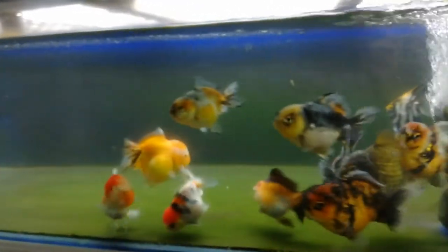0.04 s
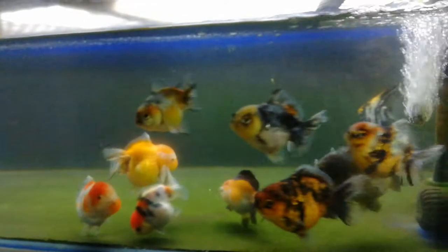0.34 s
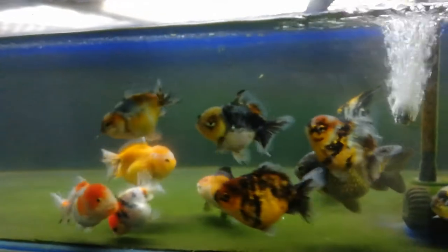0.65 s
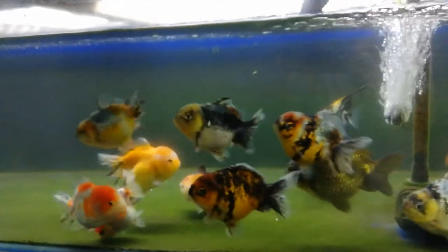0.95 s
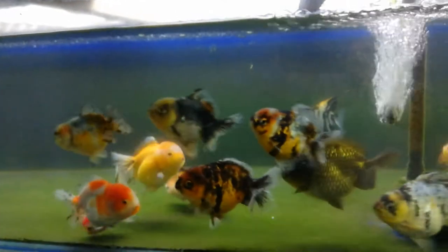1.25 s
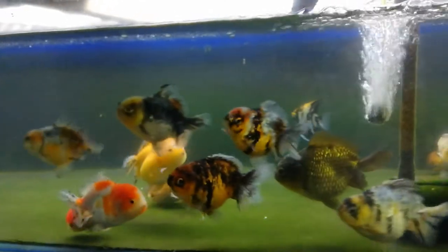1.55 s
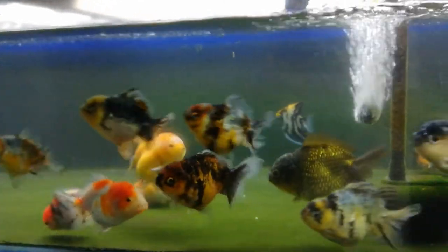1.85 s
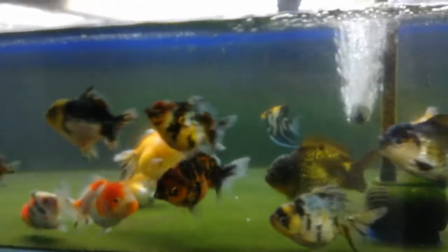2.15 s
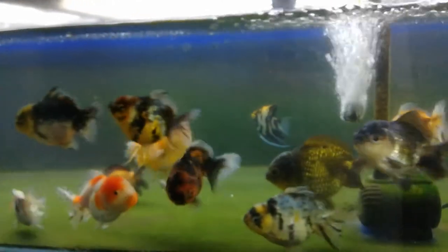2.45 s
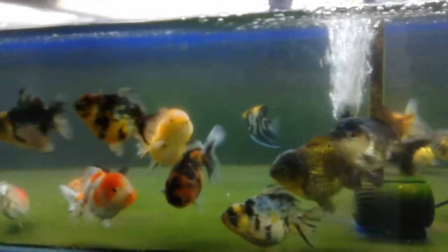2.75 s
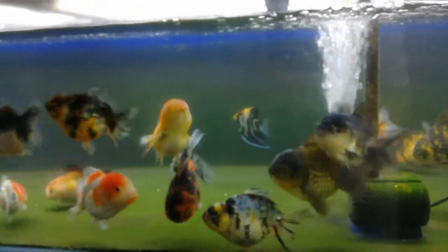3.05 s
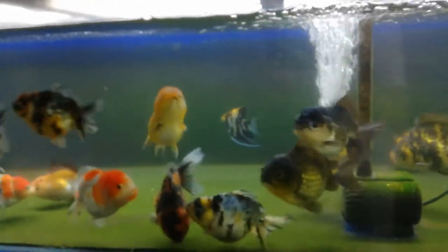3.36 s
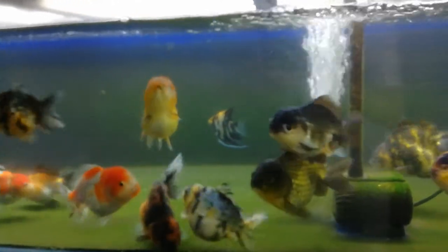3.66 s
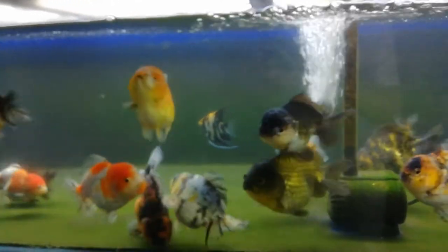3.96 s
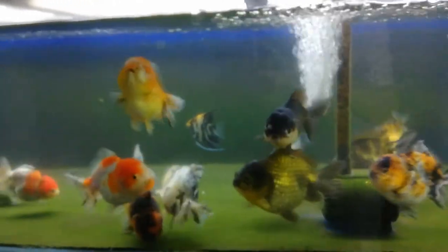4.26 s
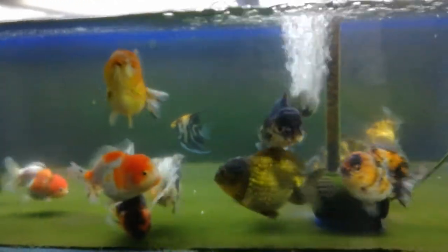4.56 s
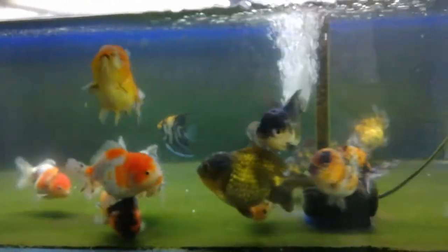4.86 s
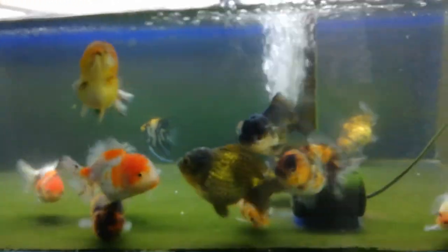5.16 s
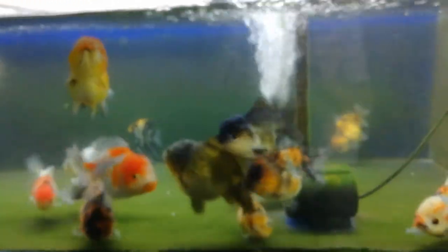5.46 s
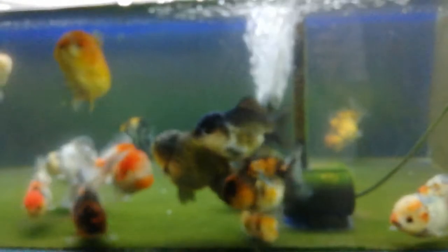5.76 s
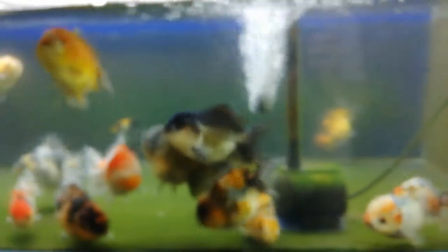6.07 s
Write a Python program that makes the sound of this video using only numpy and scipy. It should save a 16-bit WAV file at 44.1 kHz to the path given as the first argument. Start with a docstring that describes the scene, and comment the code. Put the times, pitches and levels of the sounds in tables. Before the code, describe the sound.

An air stone bubbles in a fish tank with a steady fizzing hiss, small pops and gurgles, over a low pump hum.

```python
"""An air stone fizzes in a glass fish tank, on the right: countless tiny bubbles make a steady hiss.
Bubble films snap at the surface, single bubbles ring as they pinch off, and clusters gurgle as they
break. The glass and the room echo it all. Behind it an air pump hums on mains power and throbs
against a slightly faster motor, over a low room rumble and one soft knock."""
import sys
import numpy as np
from scipy import signal
from scipy.fft import rfft, irfft, next_fast_len
from scipy.io import wavfile
from scipy.ndimage import uniform_filter1d, map_coordinates

SR = 44100
rng = np.random.default_rng(int(sys.argv[2]) if len(sys.argv) > 2 else 0)


def put_to_file(sound):
    """Save the sound as 16-bit audio at rate SR, in the file named by the first command-line argument."""
    columns = np.atleast_2d(sound).T  # one column per channel
    safe = np.clip(columns, -1, 1)
    whole_steps = np.round(safe * 32767)
    wavfile.write(sys.argv[1], SR, whole_steps.astype(np.int16))


N = 269451

# The foam's hiss as the tank colours it. Each row: frequency in Hz, relative level in dB.
FIZZ_COLOUR = [(300, -22), (600, -6), (1300, -5.5), (2200, -2), (3500, .5), (4400, -6), (5800, -9),
               (8400, -1.5), (9050, 1), (9700, -2), (11600, -2.5), (12700, -7.5), (14100, -8.5),
               (15700, -15)]
# The loudest bubble films snapping. Each row: start in seconds, relative level in dB,
# centre of the click in Hz, level of the lower body in dB compared with the click.
FILM_POPS = [(0.708, -30, 10100, -17), (0.8182, -24, 10300, -13), (0.8525, -21, 8300, -20),
             (0.884, -26, 10000, -30), (1.811, -27.5, 9500, -12.5), (2.2775, -24, 9400, -7),
             (2.5427, -25.5, 11700, -32), (3.474, -29, 8930, -10), (3.727, -28, 9050, -5),
             (4.0423, -32, 9600, -20), (4.305, -32, 10400, -6), (4.9383, -22, 8250, -10),
             (5.6925, -24, 9200, -14)]
# The loudest ringing bubbles. Each row: start in seconds, relative level in dB, pitch in Hz.
RINGING_BUBBLES = [(.376, -30, 3400), (.717, -29, 3290), (.815, -38.5, 344), (.854, -22, 7860),
                   (1.1225, -27, 3260), (1.282, -19, 2625), (1.34, -35, 1486), (1.832, -31.5, 3160),
                   (1.984, -31, 3000), (2.279, -34, 4950), (2.624, -33.5, 3400), (2.681, -37.5, 850),
                   (2.8175, -27, 2540), (4.043, -25.5, 1650), (4.947, -25.5, 6830), (5.242, -32, 1427),
                   (5.663, -28.5, 3200), (5.694, -31, 5140)]
# The loudest clusters breaking. Each row: start in seconds, relative level in dB, centre in Hz.
BREAKING_CLUSTERS = [(0.11, -27.5, 2420), (2.016, -34, 2420), (2.671, -34, 2040), (2.908, -31.5, 3000),
                     (4.0405, -29, 2720), (4.1082, -29.5, 3250), (4.187, -30, 4060), (4.239, -31, 2840),
                     (4.8797, -29, 2320), (5.253, -26.5, 2300), (6.019, -29.5, 2850)]
# The left microphone faces away from the tank. Each row: frequency in Hz, change in level in dB.
LEFT_SHADE = [(300, -12), (700, 0), (1300, -3.5), (2600, -14.5), (3400, -12.5), (4200, -12), (6000, -14.5),
              (9000, -24.5), (12000, -28.5), (15800, -26)]
# The pump's tones. Each row: multiple of its stroke rate, base levels in dB on the left and right.
PUMP_TONES = [(2, -46, -46), (3, -56, -56), (5, -63.5, -72), (6, -64, -59), (7, -60.5, -63),
              (8, -69.5, -82), (9, -87, -65.5), (12, -65, -79)]
# The second motor's tones. Each row: multiple of its speed, base levels in dB on the left and right.
MOTOR_TONES = [(2, -55.5, -56), (3, -58, -61), (4, -49, -49), (5, -73, -60.5), (6, -64.5, -64),
               (7, -71, -64.5), (12, -78, -50), (13, -120, -75), (14, -85, -59.5), (15, -79.5, -54.5),
               (16, -83, -60), (19, -63, -110), (20, -77, -61.5), (21, -79, -59), (23, -61, -74),
               (24, -82, -64.5), (25, -86, -57), (26, -63, -61), (28, -90, -117), (30, -95, -81)]
# A soft, low knock. Each row: start in seconds, level in dB.
SOFT_KNOCKS = [(4.554, -37.5)]
# The room's rumble. Each row: frequency in Hz, relative level in dB.
RUMBLE_COLOUR = [(15, -13), (35, -0.5), (50, 8.5), (75, -6.5), (110, 2), (170, -3.5), (350, -1.5),
                 (520, -3.5), (900, -7), (2000, -15), (6000, -35)]
# How alike the rumble is on both sides. Each row: frequency in Hz, likeness from 0 to 1.
RUMBLE_LIKENESS = [(100, .99), (250, 0.74), (500, 0), (900, 1)]

LEFT_DELAY = 26  # samples by which the tank's direct sound comes later on the left
TIME = np.arange(N) / SR
EVENT_TIME = np.arange(SR // 4) / SR  # seconds within one short sound
EVENT_SAMPLES = len(EVENT_TIME)


def fizz(hiss_db=-40.5, direct_share=0.34, patchy_db=2.5):
    """Countless tiny bubbles merge into a hiss, partly heard directly, partly as echoes."""
    noise = rng.standard_normal(N)
    direct = np.sqrt(direct_share) * np.array([np.roll(noise, LEFT_DELAY), noise])
    echoes = np.sqrt(1 - direct_share) * rng.standard_normal((2, N))
    spectrum = signal.stft(direct + echoes, nperseg=1024)[2]
    # Bubbles of similar size come in clumps: louder patches in pitch and time.
    clumps = uniform_filter1d(rng.standard_normal(spectrum.shape[1:]), size=4, axis=0)
    clumps = uniform_filter1d(clumps, size=8, axis=1)
    hiss = signal.istft(spectrum * amp(patchy_db * unit(clumps)), nperseg=1024)[1][:, :N]
    flicker_db = 0.29 * wobble(4.45) + 0.18 * wobble(35)
    return amp(hiss_db + flicker_db) * unit(coloured(hiss, FIZZ_COLOUR))


def crackle(level_db=-37, spread_db=9, rarity=1.23, body_db=-7, body_hz=4700, count=190):
    """Small bubbles pop at random moments; larger ones sound lower and have more body."""
    out = np.zeros((2, N))
    for when, size, loud in rng.random((count, 3)):
        snap = coloured(tank_echoes(np.ones(1), direct_db=-14), FIZZ_COLOUR)
        click = unit(band(snap, 13500 - 7500 * size ** 1.53, octaves=0.35))
        body = amp(body_db) * size * unit(band(snap, body_hz, octaves=0.53))
        add(out, when * (N - 1) / SR, click + body, level_db - spread_db * (1 - loud ** rarity))
    return out


def pops(gain_db=-6, body_hz=4470):
    """A bubble's film snaps with a bright click; the hollow under it adds a lower body."""
    out = np.zeros((2, N))
    for start, db, hz, body_db in FILM_POPS:
        snap = tank_echoes(np.ones(1), direct_db=-13, glass_s=.075, room_s=.42, room_db=-7)
        click = band(coloured(snap, FIZZ_COLOUR), hz, octaves=0.58)
        add(out, start, click, db + gain_db)
        add(out, start, band(snap, body_hz, octaves=0.16), db + gain_db + body_db)
    return out


def bubble_ring(hz, cycles, rise):
    """A tone fades to about a third in `cycles` swings; its pitch climbs as a bubble nears the surface."""
    age = EVENT_TIME * hz / cycles
    pitch = hz * (1 + rise * (1 - np.exp(-age)))
    soft_start = 1 - np.exp(-5 * age)
    return np.sin(2 * np.pi * np.cumsum(pitch) / SR) * np.exp(-age) * soft_start


def bubbles(gain_db=-6, small_db=-42, spread_db=7, rarity=3, count=350):
    """Single bubbles ring as they pinch off, over a patter of small ones of which few stand out."""
    out = np.zeros((2, N))
    for start, db, hz in RINGING_BUBBLES:
        cycles = 6.3 * (3000 / hz) ** 0.4  # larger, lower bubbles ring for more swings
        ring = bubble_ring(hz, cycles, rise=.04)
        echoed = tank_echoes(ring, direct_db=-10, glass_s=.06, room_s=.36, room_db=-6)
        add(out, start, echoed, db + gain_db)
    for when, size, loud in rng.random((count, 3)):
        hz = 3950 * np.exp(-1.1 * size ** 1.387)  # small, high bubbles are the commonest
        echoed = tank_echoes(bubble_ring(hz, cycles=6.9, rise=0.086), direct_db=-9, room_s=0.74)
        db = small_db - spread_db * (1 - loud ** rarity) - 4 * size
        add(out, when * (N - 1) / SR, echoed, db)
    return out


def gurgles(gain_db=-7, fade_s=0.02, bursts_per_s=700, faint_db=-37, faint_hz=2900, count=10):
    """A raft of bubbles collapses in a quick run of bursts; fainter rafts break at random moments."""
    out = np.zeros((2, N))
    faint = [(when * (N - 1) / SR, faint_db, faint_hz * 2 ** (pitch - .5))
             for when, pitch in rng.random((count, 2))]
    for start, db, hz in BREAKING_CLUSTERS + faint:
        signs = rng.choice([-1, 1], EVENT_SAMPLES)
        bursts = rng.random(EVENT_SAMPLES) < bursts_per_s / SR
        run = signs * bursts * np.exp(-EVENT_TIME / fade_s)
        run[0] = 1.7  # the first burst sets off the others
        echoed = tank_echoes(run, direct_db=-6.5, room_db=-0.5)
        add(out, start, band(echoed, hz, octaves=0.62), db + gain_db)
    return out


def tank_echoes(x, direct_db, glass_s=0.065, room_s=0.49, room_db=-8):
    """The direct sound, then echoes of glass and room that fade by 60 dB in glass_s and room_s seconds."""
    fade = amp(-60 * EVENT_TIME / glass_s) + amp(room_db - 60 * EVENT_TIME / room_s)
    response = rng.standard_normal((2, EVENT_SAMPLES)) * fade / np.linalg.norm(fade)
    response[0, LEFT_DELAY] += amp(direct_db)
    response[1, 0] += amp(direct_db)
    return signal.fftconvolve(x[None], response, axes=1)[:, :EVENT_SAMPLES]


def hum_tone(multiple, base_hz, left_db, right_db, swell, in_step_s=.045, waver_db=0.97):
    """One wavering tone of a motor; reflections shift higher tones more between left and right."""
    hz = multiple * base_hz
    offset = rng.uniform(0, 2 * np.pi) * (multiple - 2)  # both motors' second tones line up at in_step_s
    jitter = 0.017 * multiple ** 1.07 * wobble(7)
    phase = 2 * np.pi * hz * (TIME - in_step_s) + offset + jitter + np.angle(swell)
    tone = np.array([amp(left_db) * np.sin(phase - hz / 290), amp(right_db) * np.sin(phase)])
    return np.sqrt(2) * np.abs(swell) * tone * amp(waver_db * wobble(5))


def hum(pump_hz=50.012, motor_hz=53.027, swell_hz=0.33, crest_s=2.05, faint_hz=164.6):
    """The pump and a faster motor hum; their second tones throb together six times a second."""
    # A hum just below the pump's third tone makes that tone slowly swell and sink.
    swell = 1 + amp(-4.5) * np.exp(-2j * np.pi * swell_hz * (TIME - crest_s))
    pump = sum(hum_tone(k, pump_hz, left, right, swell if k == 3 else 1) for k, left, right in PUMP_TONES)
    motor = sum(hum_tone(k, motor_hz, left, right, swell=0.97) for k, left, right in MOTOR_TONES)
    faint_tone = amp(-63) * np.sqrt(2) * np.sin(2 * np.pi * faint_hz * TIME)
    return pump + motor + faint_tone


def knocks(knock_hz=190):
    """A dull bump that dies away too fast to ring."""
    out = np.zeros((2, N))
    bump = bubble_ring(knock_hz, cycles=1, rise=0)
    for start, db in SOFT_KNOCKS:
        add(out, start, np.array([bump, bump]), db)
    return out


def rumble(level_db=-53):
    """Low noise of the room and moving water; its deepest part is nearly alike on both sides."""
    def response(hz):
        angle = np.arccos(np.clip(along(RUMBLE_LIKENESS, hz), -1, 1)) / 2
        return amp(along(RUMBLE_COLOUR, hz)) * [np.cos(angle), np.sin(angle)]
    shared, opposite = filtered(rng.standard_normal((2, N)), response)
    return amp(level_db) * unit(np.array([shared + opposite, shared - opposite]))


def amp(db):
    """Turn decibels into a number to multiply by."""
    return 10 ** (np.asarray(db) / 20)


def unit(x):
    """Scale a signal to an average strength (rms) of 1."""
    return x / np.sqrt(np.mean(x ** 2) + 1e-20)


def along(table, hz):
    """Read between a table's rows, with frequency spaced in octaves."""
    row_hz, values = np.transpose(table)
    return np.interp(np.log(hz + 1), np.log(row_hz + 1), values)


def wobble(rate):
    """A smooth curve through `rate` random values a second."""
    return map_coordinates(rng.standard_normal(int(N * rate / SR) + 4), [TIME * rate])


def filtered(x, response):
    """Multiply each frequency in x by response(hz)."""
    length = x.shape[-1]
    padded = next_fast_len(length + 4096)
    return irfft(rfft(x, padded) * response(np.fft.rfftfreq(padded, 1 / SR)), padded)[..., :length]


def coloured(x, table):
    """Turn frequencies up or down by a table's decibels."""
    return filtered(x, lambda hz: amp(along(table, hz)))


def band(x, centre_hz, octaves):
    """Keep a bell-shaped range of frequencies around a centre."""
    return filtered(x, lambda hz: np.exp(-.5 * (np.log2((hz + 1) / centre_hz) / octaves) ** 2))


def add(out, start_s, sound, db):
    """Mix in a short stereo sound so that its loudest moment on the right is at db."""
    start = max(round(start_s * SR), 0)
    crest = np.sqrt(np.max(uniform_filter1d(sound[1] ** 2, size=256)))
    out[:, start:start + EVENT_SAMPLES] += amp(db) * sound[:, :N - start] / crest


def scene():
    """The water sounds duller and quieter on the left; hum and rumble fill the room."""
    left, right = fizz() + crackle() + pops() + bubbles() + gurgles()
    water = np.array([coloured(left, LEFT_SHADE), right])
    return water + hum() + rumble() + knocks()


def record(dry, top_hz=15800):
    """The camera picks up nothing above top_hz."""
    return filtered(dry, lambda hz: hz < top_hz)


dry = scene()
out = record(dry)
put_to_file(out)
```